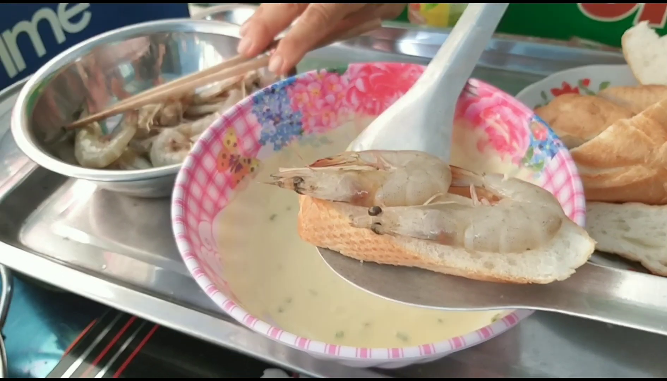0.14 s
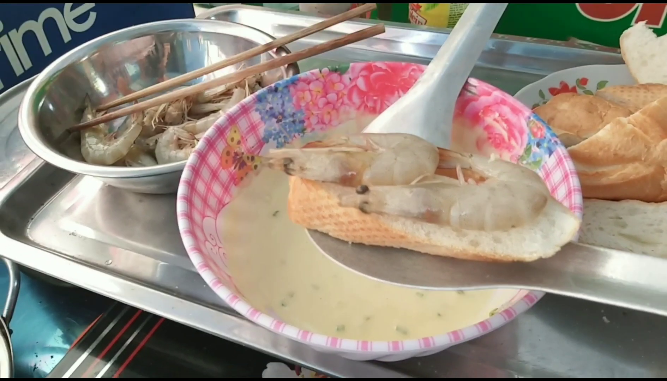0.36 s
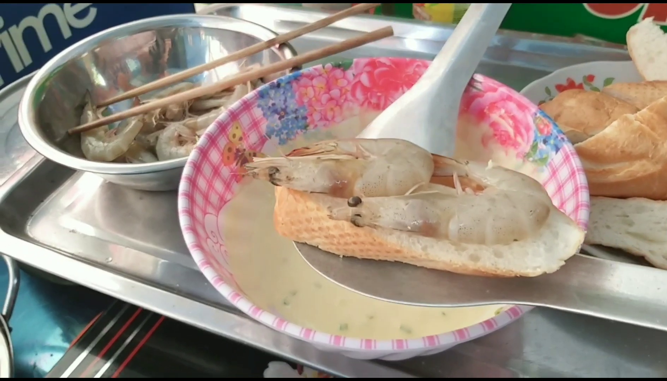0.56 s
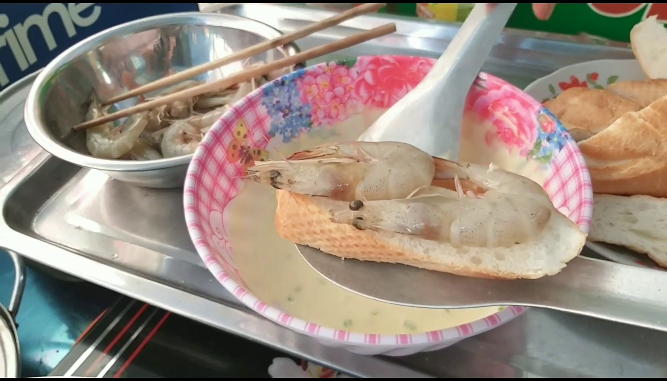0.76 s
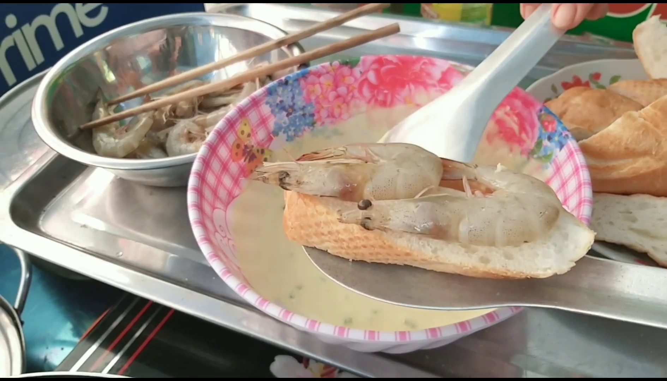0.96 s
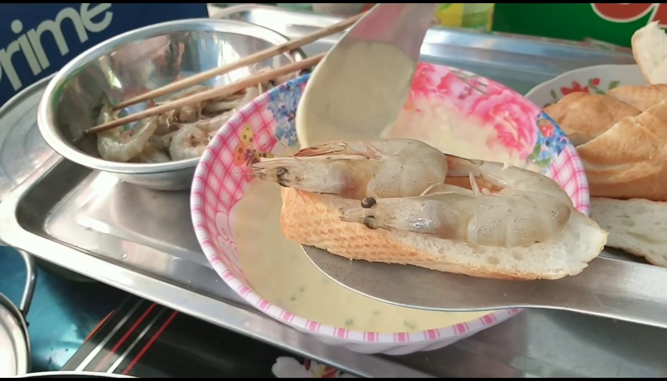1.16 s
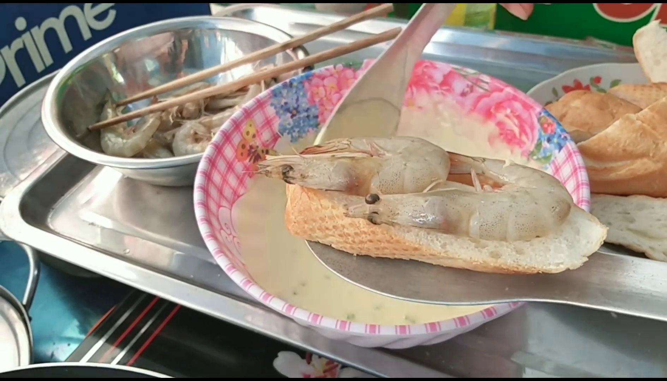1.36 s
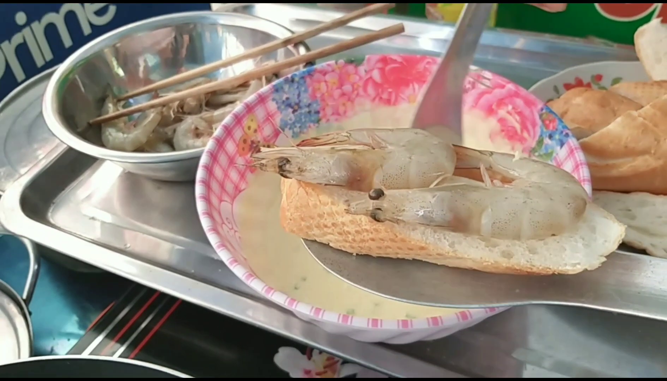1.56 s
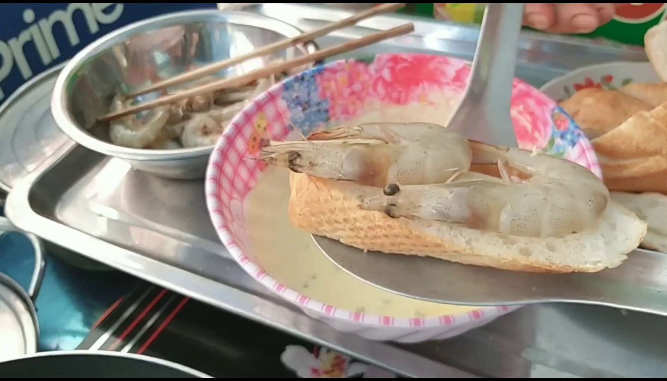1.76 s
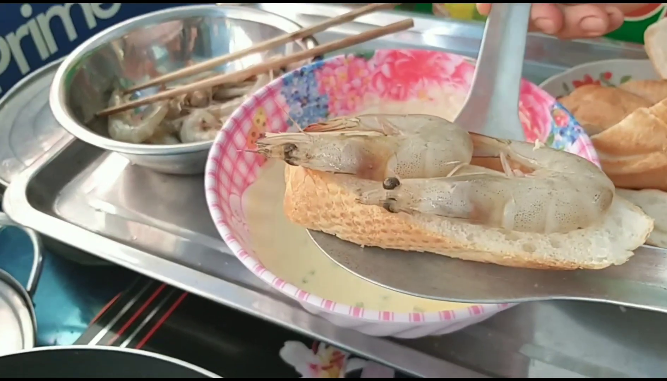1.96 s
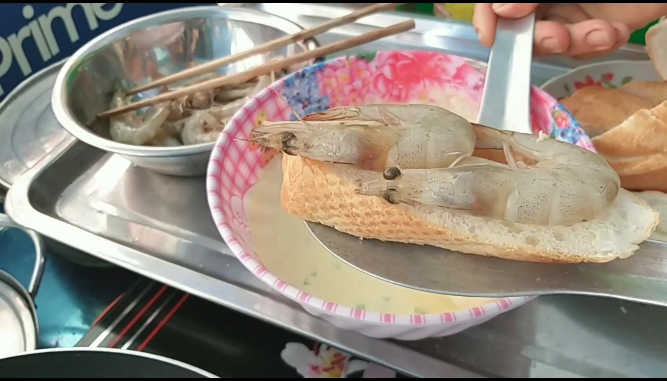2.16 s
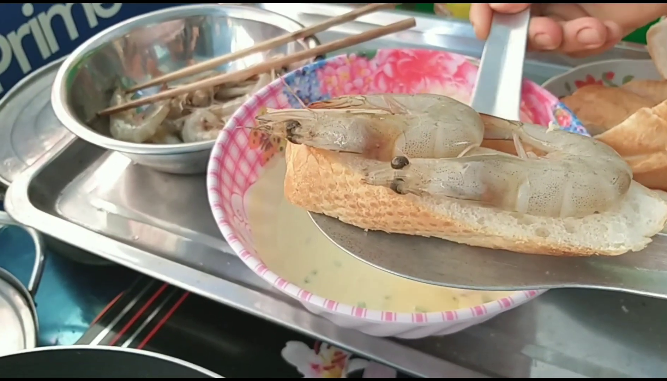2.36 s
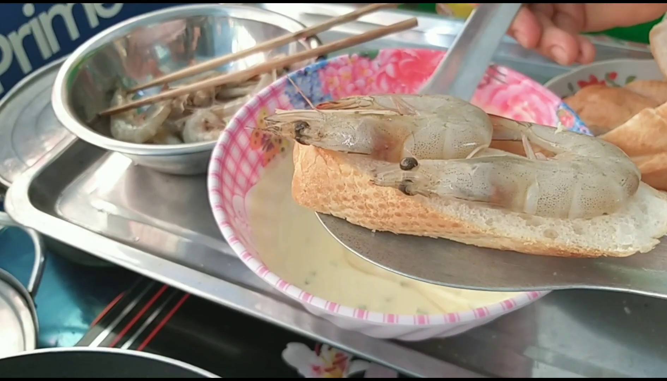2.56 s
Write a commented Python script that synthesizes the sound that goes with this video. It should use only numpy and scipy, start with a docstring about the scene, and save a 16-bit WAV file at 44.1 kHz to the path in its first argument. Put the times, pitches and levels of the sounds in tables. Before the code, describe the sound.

Bright metallic clatter ringing from a steel bowl, followed by spoon knocks, small scrapes and ticks

```python
"""A kitchen table in a small room: a utensil clatters on a steel bowl, rings and is damped; the bowl sings on.
A spoon knocks, scrapes and ticks in a bowl of batter close by, and steelware rings softly near the start.
Struck objects are sums of fading sine tones; cracks, scrapes and ticks are shaped noise.
Under it lie a low rumble, hiss, faint hums and a fuzzy high whine, all made from noise and sines."""
import sys
import numpy as np
from scipy import signal
from scipy.fft import rfft, irfft, next_fast_len
from scipy.io import wavfile
from scipy.ndimage import map_coordinates

SR = 44100
rng = np.random.default_rng(int(sys.argv[2]) if len(sys.argv) > 2 else 0)


def to_wav(s):
    """Save 16-bit WAV."""
    ch = np.atleast_2d(s).T  # columns
    pcm = np.round(np.clip(ch, -1, 1) * 32767)  # PCM
    wavfile.write(sys.argv[1], SR, pcm.astype(np.int16))


N = 114660
T = np.arange(N) / SR  # time of each sample, in seconds
STEEL_RISE_S = 0.0022  # how gradually the steel bowl and the touched steelware start to ring


def amp(db):
    """Turn decibels into a gain."""
    return 10 ** (np.asarray(db) / 20)


def unit(x):
    """Scale x to an average (rms) level of 1."""
    return x / np.sqrt(np.mean(x ** 2) + 1e-20)


def filtered(x, response):
    """Multiply the spectrum of x by a response, given as a function of frequency."""
    size = next_fast_len(N + SR // 2)
    spectrum = rfft(x, size)
    gain = response(np.fft.rfftfreq(size, 1 / SR))
    return irfft(spectrum * gain, size)[:N]


def colour(points):
    """Make a response that joins (pitch_hz, level_db) points along a logarithmic pitch axis."""
    point_hz, point_db = np.transpose(points)
    return lambda hz: amp(np.interp(np.log(hz + 1), np.log(point_hz + 1), point_db))


def band(centre_hz, half_width_hz):
    """Make a narrow response whose gain is halved at half_width_hz either side of the centre."""
    return lambda hz: 1 / (1 + ((hz - centre_hz) / half_width_hz) ** 2)


def noise(response):
    """Make random noise with the given spectrum, at rms 1."""
    return unit(filtered(rng.standard_normal(N), response))


def wobble(rate):
    """Draw a smooth random curve through `rate` random points a second."""
    return map_coordinates(rng.standard_normal(N // 8), [T * rate + 2])


def fade(start_s, t60, rise=0.000067):
    """Shape a blow: a quick rise, then a steady fall of 60 dB every t60 seconds."""
    age = np.maximum(T - start_s, 0)
    return amp(-60 * age / t60) * (1 - np.exp(-age / rise))


def ring(hz, flutter_db, drift):
    """A tone that flutters in level and drifts in phase (radians) as the object rocks."""
    phase = 2 * np.pi * (hz * T + rng.random()) + drift * wobble(29)
    return amp(flutter_db * wobble(55)) * np.sin(phase)


def clatter():
    """Three contacts set utensil and bowl ringing, each with a noisy crack and rattle; bowl tones beat in pairs."""
    # contacts: start_s, utensil_db, bowl_db, crack_db (before the common crack gain),
    # favoured_hz (pitch the contact point favours), boost_db (at that pitch)
    contacts = [(0.2214, 0, -3, -11, 2780, 5.5), (0.2462, -0.5, 0, -16.5, 3350, 1.5),
                (0.3159, -9, -9.5, -21, 2490, 12)]
    # ringing tones of the utensil: pitch_hz, level_db, t60_s
    utensil_modes = [(1794, -19, .21), (1864, -17.5, .19), (1921, -21, .18), (2026, -23, .17),
                     (2595, -26, .17), (2685, -9, .125), (3794, -5, .35), (4790, -28, .12),
                     (5230, -31, .15), (8480, -31, .16)]
    # ringing tones of the steel bowl: pitch_hz, level_db, t60_s
    bowl_modes = [(1750, -30, .38), (2410, -32, .16), (2620, -27, .1), (2686, -32, .5), (3160, -28, .37),
                  (3817, -31, .48), (4353, -24.5, .53), (4774, -29.5, .52), (5895, -38, .58),
                  (6218, -44, .6), (8021, -56, .8), (8145, -39, .18), (9710, -36, .2)]
    # spectrum of the crack: pitch_hz, level_db
    crack_colour = [(50, -42.5), (120, -26), (270, -2.5), (1200, 1), (2000, 6.5), (5000, 4.5), (7300, -11),
                    (8600, -0.5), (11000, -2), (15500, -23)]
    utensil_rise_s, settle_s, damped_t60_s = 0.0042, 0.317, 0.07
    crack_t60_s, rattle_t60_s, rattle_db, crack_gain_db = 0.037, 0.26, -13, -2

    def fed(hz, t60, column, rise):
        """Add the energy that all contacts give to one tone."""
        energy = 0
        for contact in contacts:
            favoured_hz, boost_db = contact[-2:]
            octaves_off = np.log2(hz / favoured_hz)
            boost = boost_db * np.exp(-(octaves_off / .2) ** 2)
            energy = energy + (amp(contact[column] + boost) * fade(contact[0], t60, rise)) ** 2
        return np.sqrt(energy)

    def pair(hz):
        """A tone and a quieter twin 9 to 24 Hz higher, which beat together."""
        twin = ring(hz + rng.uniform(9, 24), flutter_db=.7, drift=.15)
        return ring(hz, flutter_db=.7, drift=.15) + amp(-11) * twin

    utensil = sum(amp(db) * fed(hz, t60, 1, utensil_rise_s) * ring(hz, flutter_db=1.0, drift=0.11)
                  for hz, db, t60 in utensil_modes)
    # the utensil is damped as it settles, on top of its natural fading
    damping = amp(-60 * np.maximum(T - settle_s, 0) / damped_t60_s)
    bowl = sum(amp(db) * fed(hz, t60, 2, STEEL_RISE_S) * pair(hz) for hz, db, t60 in bowl_modes)
    cracks = np.zeros(N)
    for start_s, _, _, crack_db, _, _ in contacts:
        rattle = amp(rattle_db) * fade(start_s, rattle_t60_s)
        cracks += amp(crack_db) * (fade(start_s, crack_t60_s) + rattle)
    return damping * utensil + bowl + amp(crack_gain_db) * cracks * noise(colour(crack_colour))


def knocks():
    """The spoon hits the filled bowl: short tones, click, thump and bright edge, then table and room answer."""
    # blows: start_s, level_db, softness_hz (treble above it is dulled), room_db (change from the usual),
    # pitch_ratio, thump_db, tilt_db_per_octave (of the tones, around 1300 Hz)
    blows = [(0.0250, -16, 2220, 1, 1, -19, 7.5), (0.0334, -17.5, 2380, -5.5, 1.53, -28, -2.5),
             (1.4653, -22.5, 2600, 1.5, 0.82, -14.5, 5), (1.7540, -3, 7550, -2.5, 0.96, -35, 2),
             (2.3110, -27.5, 2720, 2, 0.93, -45, 7.5), (2.4212, -31.5, 2640, 5, 0.86, -17, 8)]
    # tones of the batter bowl: pitch_hz (before the pitch ratio), level_db (before the tilt), t60_s, rise_s
    dish_modes = [(777, -12.5, 0.096, 0.0074), (900.5, -6.5, 0.045, 0.0043), (1214, -4.5, 0.016, 0.00025),
                  (1403, -4, 0.016, 0.0012), (2676, -7, 0.014, 0.00082), (3947, -14, 0.02, 0.00043),
                  (5190, -15, 0.013, 0.00054)]
    # spectrum of the click: pitch_hz, level_db
    click_colour = [(150, -39), (1450, 13.5), (1950, -3.5), (2600, -14), (6000, -11), (7000, -22)]
    # spectrum of the bright edge: pitch_hz, level_db
    edge_colour = [(3000, -25), (6000, -1), (13000, -3.5), (15500, -8)]
    # spectrum of the answer of table and room: pitch_hz, level_db
    answer_colour = [(50, -20.5), (110, 0), (330, -2), (550, -5.5), (800, -2), (1350, -3.5), (1950, -9),
                     (5200, -15), (8000, -35.5)]
    thump_hz, thump_t60_s = 320, 0.142
    click_db, click_t60_s = -8, 0.009
    edge_db, edge_lag_s, edge_t60_s = -30, 0.0022, 0.023
    answer_db, answer_t60_s, bass_t60_s = -17.5, 0.27, .33
    out = np.zeros(N)
    for start_s, level_db, softness_hz, room_db, pitch_ratio, thump_db, tilt_db in blows:
        age = T - start_s
        body = np.zeros(N)
        for hz, mode_db, t60, rise in dish_modes:
            gain = amp(mode_db + tilt_db * np.log2(hz / 1300))
            body += gain * fade(start_s, t60, rise) * np.sin(2 * np.pi * hz * pitch_ratio * age)
        thump = amp(thump_db) * fade(start_s, thump_t60_s, rise=.003) * np.sin(2 * np.pi * thump_hz * age)
        click = amp(click_db) * fade(start_s, click_t60_s) * noise(colour(click_colour))
        edge = amp(edge_db) * fade(start_s + edge_lag_s, edge_t60_s) * noise(colour(edge_colour))
        # the bass of the answer swells more slowly and lasts longer than the rest
        wash = noise(colour(answer_colour))
        bass = filtered(wash, lambda hz: 1 / (1 + (hz / 300) ** 4))
        tail = bass * fade(start_s, bass_t60_s, rise=0.035)
        tail += (wash - bass) * fade(start_s, answer_t60_s, rise=0.00057)
        soft = signal.butter(3, softness_hz, fs=SR, output="sos")
        dull = signal.sosfilt(soft, body + thump + click + amp(answer_db + room_db) * tail)
        out += amp(level_db) * (dull + edge)
    return out


def scrapes():
    """Dense uneven slips make spoon and bowl resonate; each stroke squeaks at the pitch of its contact point."""
    # strokes: loudest_s, rise_s, fall_s, level_db, squeak_hz, squeak_db (over the stroke)
    strokes = [(0.006, 0.013, .03, -36, 1407, -13), (0.915, 0.0054, 0.0069, -50, 3200, -1.5),
               (0.951, 0.013, 0.013, -32, 3304, -4), (0.965, 0.0099, 0.013, -37, 1696, -2),
               (2.338, 0.021, 0.012, -40.5, 1590, -18), (2.354, 0.011, 0.005, -37.5, 2300, -8)]
    # spectrum of the broad rubbing noise: pitch_hz, level_db
    bed_colour = [(200, -23.5), (650, -1), (5000, -0.5), (7500, -19), (12300, -15.5), (15500, -27)]
    # resonances of spoon and bowl: pitch_hz, width_hz, level_db
    resonances = [(1263, 39, -3.5), (1573, 85, 2.5), (2535, 25, -7.5)]
    roughness_db, bed_db, resonance_db, squeak_half_width_hz = 2.6, -4.5, -5.5, 70

    def body(f):
        """Add the resonances, flipping the sign of every second one."""
        total = 0
        for k, (hz, width, db) in enumerate(resonances):
            total = total + (-1) ** k * amp(db) * 1j * f * width / (hz * hz - f * f + 1j * f * width)
        return total

    slips = rng.standard_normal(N) * amp(roughness_db * wobble(700))
    rub = amp(resonance_db) * unit(filtered(slips, body))
    rub += amp(bed_db) * unit(filtered(slips, colour(bed_colour)))
    out = np.zeros(N)
    for loudest_s, rise, fall, level_db, squeak_hz, squeak_db in strokes:
        squeak = noise(band(squeak_hz, squeak_half_width_hz))
        swell = np.exp(-np.maximum((loudest_s - T) / rise, (T - loudest_s) / fall))
        out += amp(level_db) * swell * (rub + amp(squeak_db) * squeak)
    return out


def ticks():
    """Light slips of the spoon's edge: tiny bright snaps, each trailed by a thin sizzle and a short noisy ping."""
    # slips: start_s, snap_db, sizzle_db, sizzle_t60_s, ping_db
    slips = [(1.5386, -60.5, -45, 0.28, -38), (1.5762, -37, -56, 0.075, -59),
             (2.0833, -24.5, -38.5, 0.072, -39), (2.088, -26, -38.5, 0.43, -52),
             (2.1946, -43, -39.5, 0.095, -51)]
    # spectrum of the snap: pitch_hz, level_db
    snap_colour = [(1000, -3), (4500, -18), (8000, -17), (12000, 15), (15500, -2.5)]
    # spectrum of the sizzle: pitch_hz, level_db
    sizzle_colour = [(300, -16), (1900, -8.5), (4450, 0), (8000, -11.5), (11800, -3.5), (15500, -8.5)]
    ping_hz, ping_half_width_hz, ping_t60_s = 4400, 200, .1
    snaps = sum(amp(db) * fade(start_s, 0.0053) for start_s, db, _, _, _ in slips)
    trails = sum(amp(db) * fade(start_s, t60, rise=0.00163) for start_s, _, db, t60, _ in slips)
    pings = sum(amp(db) * fade(start_s, ping_t60_s, rise=0.0013) for start_s, _, _, _, db in slips)
    # rapid random level changes make the sizzle grainy
    sizzle = unit(noise(colour(sizzle_colour)) * amp(2.2 * wobble(600)))
    ping_noise = noise(band(ping_hz, ping_half_width_hz))
    return pings * ping_noise + snaps * noise(colour(snap_colour)) + trails * sizzle


def hollow():
    """One low, strongly fluttering note: the bowl rings hollowly as the spoon lifts out."""
    # the note: start_s, pitch_hz, level_db, t60_s
    note = (0.962, 665, -49, .25)
    start_s, hz, db, t60 = note
    return amp(db) * fade(start_s, t60, rise=0.0082) * ring(hz, flutter_db=9.5, drift=0.64)


def touch():
    """Lightly touched steelware: a few soft fading tones under the first knocks."""
    # tones of the steelware: pitch_hz, level_db (before the common level), t60_s
    steel_modes = [(388, -9, .24), (1308, -5, .2), (1787, 0, .21), (2121, -7, .22)]
    start_s, common_db = 0.024, -31
    return sum(amp(common_db + db) * fade(start_s, t60, STEEL_RISE_S) * ring(hz, flutter_db=4, drift=.3)
               for hz, db, t60 in steel_modes)


def room(x):
    """Small-room echo: many blurred reflections form a short fading tail, duller than the direct sound."""
    dullness = colour([(100, 4.5), (4000, -15.5), (15000, -21.5)])  # pitch_hz, level_db
    tail = noise(dullness) * fade(0.0023, t60=0.32, rise=0.0023)
    return signal.fftconvolve(x, tail / np.linalg.norm(tail))[:N]


def hums():
    """Faint low sine tones, slightly unsteady in level and phase."""
    # hums: pitch_hz, start_s, level_db
    tones = [(128.6, 1.13, -73), (75.3, 2, -65)]
    out = np.zeros(N)
    for hz, start_s, db in tones:
        fade_in = np.clip((T - start_s) / 0.063, 0, 1)
        tone = np.sin(2 * np.pi * hz * T + 0.44 * wobble(3.45))
        out += amp(db + 0.95 * wobble(3.1)) * fade_in * tone
    return out


def background():
    """Rumble and hiss of changing level, steady airy noise, and a whine of two noise bands about an octave apart."""
    # spectrum of the rumble: pitch_hz, level_db
    rumble_colour = [(45, -6.5), (125, -3), (210, -4), (300, -11), (1500, -53)]
    # loudness of the rumble over time: time_s, level_db
    rumble_level = [(0, -56.5), (1.2, -65), (2.0, -56.5), (2.6, -51.5)]
    # spectrum of the hiss: pitch_hz, level_db
    hiss_colour = [(300, -9), (900, -2), (4800, 0.5), (7000, -8.5), (9000, -8), (12500, -3), (15500, -5.5)]
    # loudness of the hiss over time: time_s, level_db
    hiss_level = [(0, -43.5), (.3, -57), (.6, -60), (1.1, -64.5), (1.45, -64.5), (1.7, -56.5), (2.0, -51),
                  (2.6, -53.5)]
    # bands of the whine: pitch_hz, width_hz (full width at half gain), level_db
    whine_bands = [(5610, 230, -58), (10790, 760, -57.5)]
    # spectrum of the airy noise: pitch_hz, level_db
    air_colour = [(2000, -13), (5000, 13.5), (9200, -21.5), (14000, 8), (15500, 5)]

    def level(rows):
        """Join the levels smoothly over time."""
        return amp(np.interp(T, *np.transpose(rows)))

    rumble = level(rumble_level) * noise(colour(rumble_colour))
    hiss = level(hiss_level) * noise(colour(hiss_colour))
    whine = sum(amp(db + 0.49 * wobble(13.0)) * noise(band(hz, width / 2)) for hz, width, db in whine_bands)
    air = amp(-61.5) * noise(colour(air_colour))
    return rumble + hiss + whine + air


def scene():
    """Add all sounds as heard from just above the table; clatter, scrapes and ticks also feed the room echo."""
    clinks = clatter()
    rubs = scrapes() + ticks()
    echo = room(amp(-12.5) * clinks + amp(-11.5) * rubs)
    spoon_and_steel = clinks + knocks() + rubs + hollow() + touch()
    return (spoon_and_steel + echo + hums() + background())[None]


def record(dry):
    """Thin the deep bass, round off the highest peaks and keep nothing above the band limit."""
    low_cut_hz, ceiling, top_hz = 83, .92, 15550
    low_cut = signal.butter(3, low_cut_hz, "high", fs=SR, output="sos")
    thin = signal.sosfilt(low_cut, dry[0])
    rounded = thin / (1 + np.abs(thin / ceiling) ** 6) ** (1 / 6)
    return filtered(rounded, lambda hz: hz < top_hz)[None]


dry = scene()
out = record(dry)
to_wav(out)
```